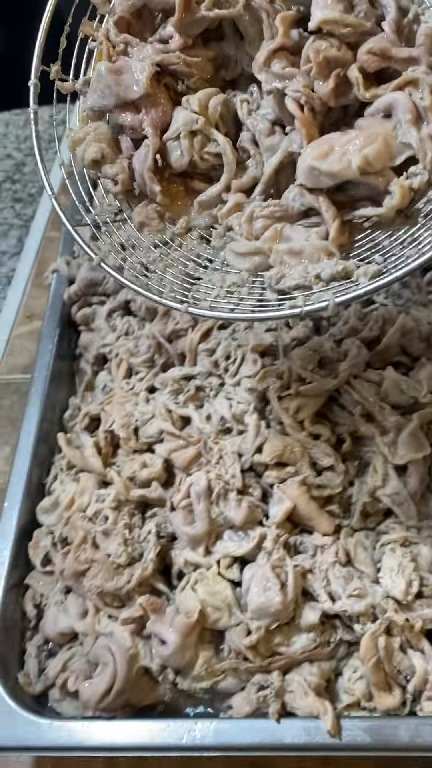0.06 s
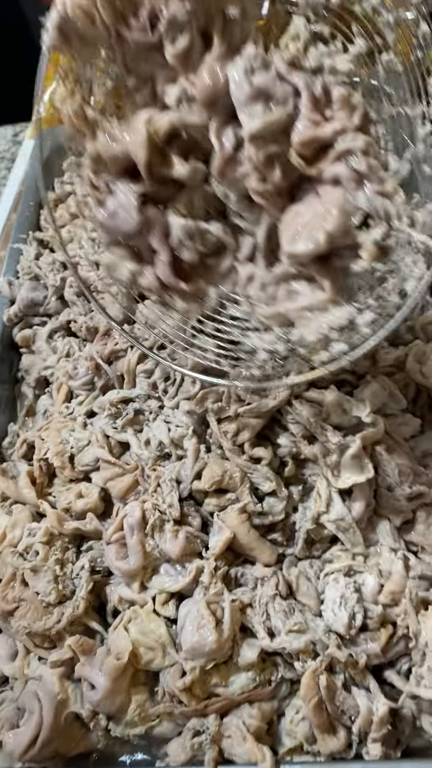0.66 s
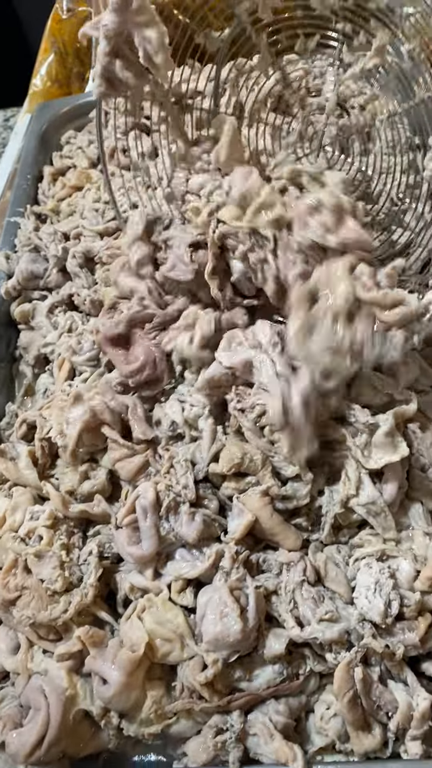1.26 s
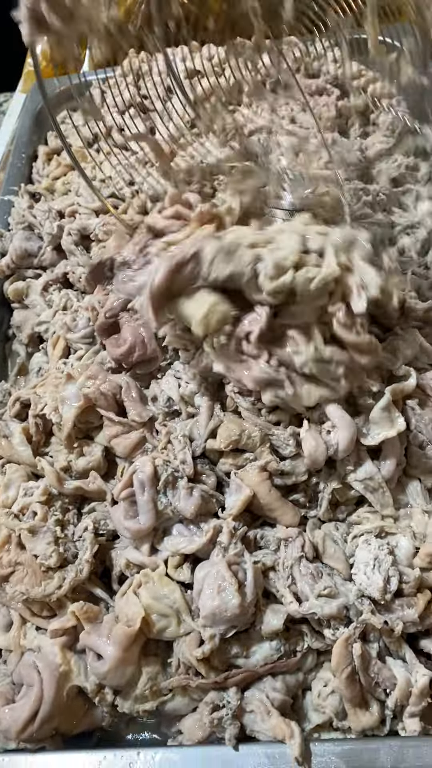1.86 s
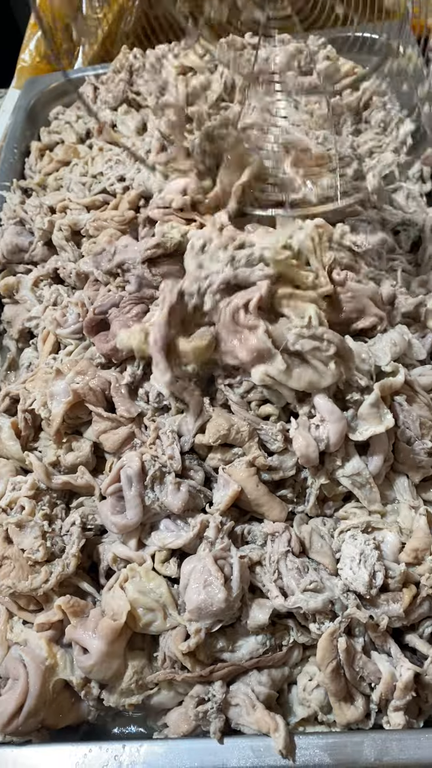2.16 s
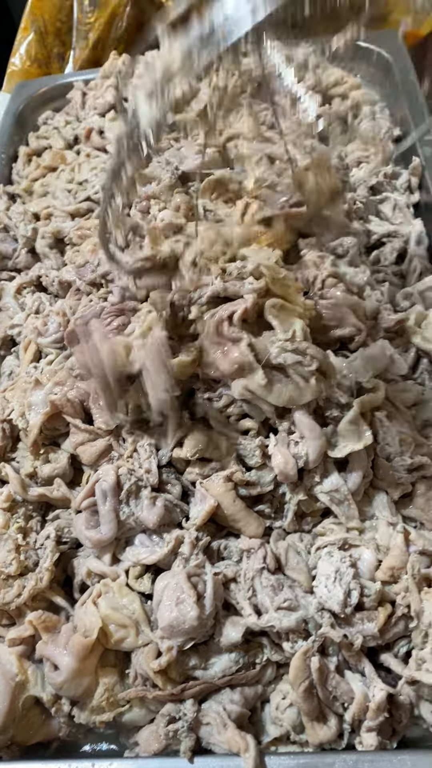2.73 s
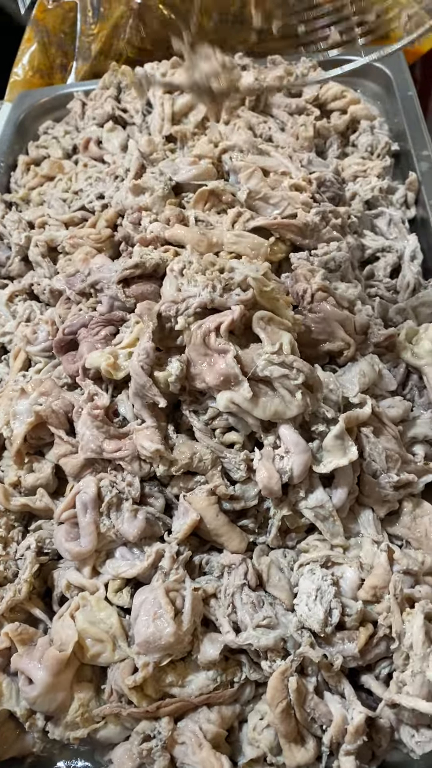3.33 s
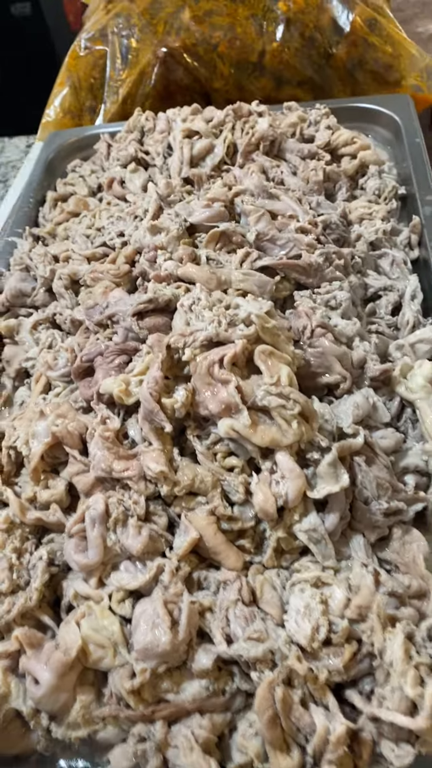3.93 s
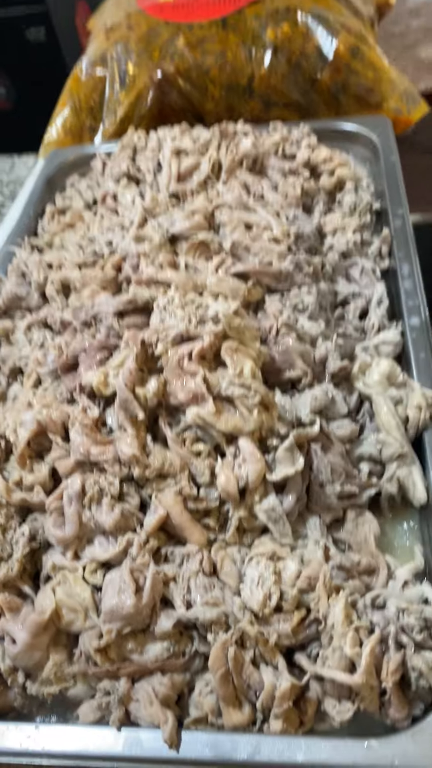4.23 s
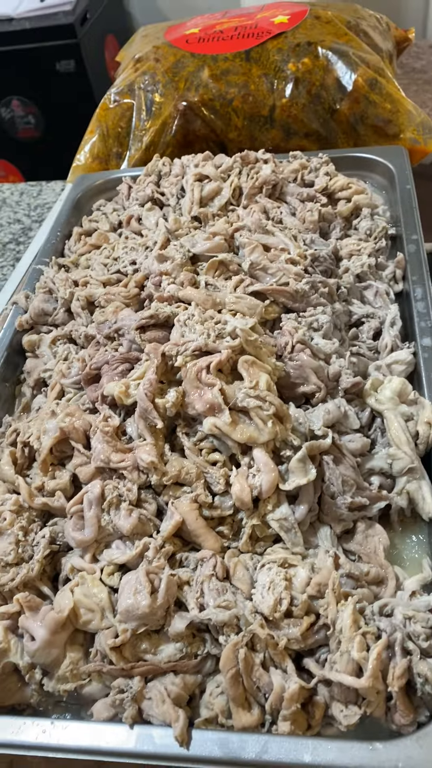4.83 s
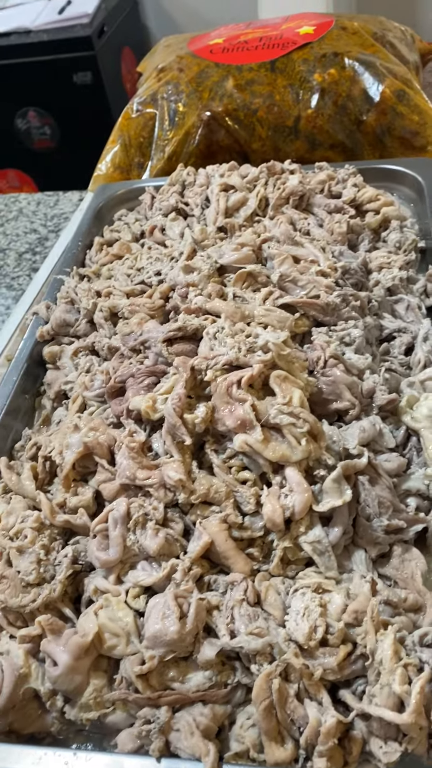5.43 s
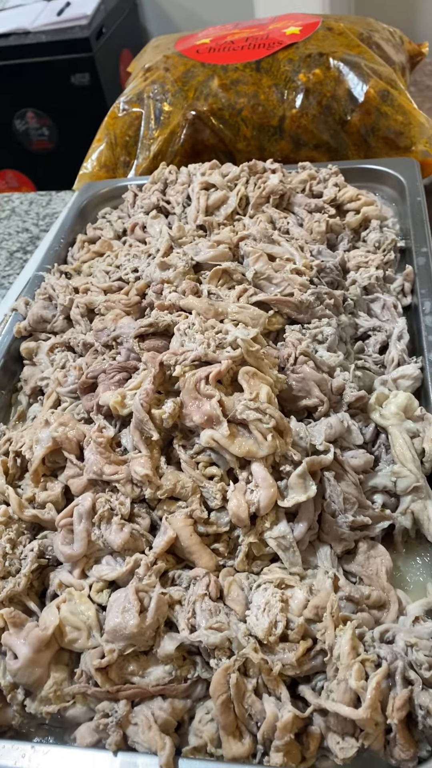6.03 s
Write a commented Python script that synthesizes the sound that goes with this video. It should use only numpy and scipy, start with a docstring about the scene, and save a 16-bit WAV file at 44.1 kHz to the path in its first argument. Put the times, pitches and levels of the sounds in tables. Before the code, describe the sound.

In a kitchen with a low, steady fridge hum, boiled meat slides off a wire skimmer into a full pan with faint, wet smacks. After a lull, the skimmer knocks loudly against a steel pot and sets it ringing. It digs through meat and broth, wires rasping on the wall, then rises with streaming water and plopping drips before knocking on the pot again. The sounds are close, with a short room reverberation.

```python
"""A kitchen, heard through two closely spaced microphone ports, with fridge motors humming behind.
Boiled meat slides off a wire skimmer into a full pan with soft, wet smacks. The skimmer then knocks
into the steel pot beside it and sets it ringing, digs through meat and broth with its wires rasping
on the wall, rises with water streaming through them, drips, and knocks on the pot again.
Close walls answer with a quick flurry of reflections, the room with a longer tail."""
import sys
import numpy as np
from scipy import signal
from scipy.fft import rfft, irfft, next_fast_len
from scipy.io import wavfile

SR = 44100
rng = np.random.default_rng(int(sys.argv[2]) if len(sys.argv) > 2 else 0)


def to_wav(sig):
    """Store sig (one row per channel, or 1-D mono) as 16-bit WAV at the path in sys.argv[1].

    Samples outside -1..1 are clipped; the rate is SR.
    """
    pcm = np.clip(np.atleast_2d(sig), -1, 1) * 32767
    pcm = np.round(pcm).astype(np.int16)
    wavfile.write(sys.argv[1], SR, pcm.T)  # frames by channels


N = 272538
TIME = np.arange(N) / SR

# The kitchen's reverberation. Each row: frequency in Hz, seconds to fall 60 dB.
ROOM_DECAY = [(200, 0.81), (1000, 0.9), (4000, 0.74), (10000, 0.38)]

MOTOR_HZ, BEAT_HZ, SWELL_S = 59, 0.508, 1.12  # the two motors are in step at SWELL_S
FAN_HZ, SING_HZ, WHINE_HZ = 205.1, 1194, 2902
# Resonances of the fridge cabinet. Each row: pitch in Hz, width in Hz, level in dB.
CABINET_MODES = [(197.2, 13, -63.5), (272, 15, -62)]
# Thin, steady tones of the compressor. Each row: pitch in Hz, level in dB.
COMPRESSOR_TONES = [(1253, -86), (2073, -78.5)]
# The fridge's singing tone grows. Each row: time in seconds, level in dB.
SING_LEVEL = [(0, -77), (3.3, -79.5), (4.2, -70.5)]
# The high whine swells twice. Each row: time in seconds, level in dB.
WHINE_LEVEL = [(0, -86), (.4, -90), (.7, -80), (1.35, -82.5), (1.55, -90.5), (2.4, -89), (2.6, -83),
               (3.9, -84), (4.2, -88)]
# A tone just below the whine comes and goes. Each row: time in seconds, level in dB.
UNDERTONE_LEVEL = [(2.5, -93), (3.1, -81), (3.6, -84), (4.1, -89)]
# Room tone of the kitchen. Each row: frequency in Hz, relative density in dB.
AIR_SPECTRUM = [(30, -20.5), (50, -1), (95, 3), (135, -3.5), (290, -4.5), (400, -11.5), (500, -15),
                (750, -15), (1150, -23), (2100, -30), (3200, -38), (4300, -42.5), (5400, -55),
                (7000, -55.5), (10000, -64.5), (13000, -77)]

# Portions of meat slide over the wires. Each row: start in seconds, end in seconds, level in dB.
MEAT_SLIDES = [(0, .3, -85), (0.558, .76, -83.5), (0.76, 0.866, -79.5), (0.906, 1.12, -80),
               (1.13, 1.33, -79), (1.55, 1.898, -86), (2.01, 2.08, -83.5), (2.67, 2.772, -76.5)]
# Moist rustle of sliding meat. Each row: frequency in Hz, relative density in dB.
SQUELCH_SPECTRUM = [(1000, -4), (2200, 12.5), (3200, 4.5), (4250, 8), (5400, -6), (7200, -12.5),
                    (10000, -23), (13000, -32.5)]
# Smacks of meat and ticks of wire. Each row: start in seconds, direct peak in dB, pitch in Hz,
# send to the room in dB, decay time in seconds.
WET_SMACKS = [(.076, -63, 6600, -14, .002), (.259, -60, 6600, -5, 0.0017), (.292, -57, 5850, -9, .002),
              (.768, -65, 2410, -1, 0.0027), (.806, -60, 2280, -1, 0.005), (.824, -64.5, 2700, -3, 0.004),
              (.865, -68, 4600, -2, 0.0043), (1.162, -64, 2600, -2, 0.0027), (1.18, -63, 4000, 0, .006),
              (1.207, -66, 4100, 2, 0.0055), (1.269, -56.5, 5360, -8, 0.0017),
              (1.363, -58, 4020, -8, 0.0021), (1.605, -58, 1970, 0, 0.0037),
              (1.626, -59.5, 4000, -7, 0.0015), (1.675, -64, 2390, -5, .01), (1.722, -63, 2480, -9, 0.0045),
              (1.883, -64.5, 3900, 1, .005), (2.233, -53, 2640, -9, 0.0037), (2.494, -70, 5900, -6, 0.0019),
              (2.725, -59, 1700, -2, 0.0028), (2.758, -60, 2300, -3, .003), (2.76, -51, 4700, -4.5, 0.0023),
              (2.761, -70, 6400, -8, 0.0027), (2.772, -54.5, 1490, -10, 0.0036),
              (4.073, -54, 3960, 7, 0.0059), (4.073, -60.5, 5650, 2.5, 0.0035),
              (4.462, -57, 3540, 10.5, .0023), (4.773, -42, 8050, -14, 0.0024),
              (4.802, -43, 9200, -14, 0.002), (5.556, -28, 3920, -18, 0.0047),
              (5.65, -48, 5150, -3, 0.0033), (5.747, -52, 5500, 2, 0.005), (5.753, -35, 3170, -4, .004),
              (5.793, -35, 2750, -5, 0.014), (5.793, -43.5, 5270, -5, 0.0042),
              (5.857, -59, 6850, -11, 0.0035), (6.063, -60, 6380, -2, .003),
              (6.091, -32.5, 3430, -3, 0.0071), (6.139, -33, 3680, -4, 0.0023)]
# Dull bumps of the heavy load. Each row: start in seconds, level in dB, pitch in Hz, width in Hz,
# length in seconds.
LOAD_BUMPS = [(4.119, -50, 255, 70.5, 0.19), (4.501, -51, 272, 39.6, 0.64), (4.6, -45, 232, 60, 0.094),
              (4.793, -37, 805, 397, 0.037), (4.8, -46.5, 229, 199, 0.12), (4.818, -42, 110, 44.7, .065),
              (4.837, -37, 845, 300, 0.027), (5.745, -44.5, 750, 160, 0.034)]

# The skimmer hits the pot. Each row: start in seconds, clatter in dB, ring of the pot in dB.
POT_KNOCKS = [(4.475, -24.5, -51), (4.609, 2, 4), (4.623, -5.5, 0.5), (4.772, -1, 2.5), (4.802, -5, -8.5),
              (4.845, -10, -8.5), (6.151, 1, -9), (6.16, -8, -7), (6.1745, 6.5, 2)]
# Modes of pot and skimmer. Each row: pitch in Hz, relative level in dB, seconds to fall 60 dB.
POT_MODES = [(543, -13.5, 0.7), (759, -7, 0.46), (1019, -3.5, 0.56), (1105, 4, 0.54), (1159, 4, 0.34),
             (1288, 5, 0.2), (1392, 1, 0.65), (1660, -8, 0.58), (1892, 0.5, .6), (1990, 3, 0.55),
             (2060, 0.5, 0.22), (2237, 2, 0.4), (2294, 5, 0.5), (2560, 3, 0.4), (2940, 4, 0.29),
             (3410, -6.5, 0.16), (3480, -9, 0.15), (3930, -11, 0.16), (4690, -3, 0.29)]
# Clatter of the wire basket. Each row: frequency in Hz, relative density in dB.
CLATTER_SPECTRUM = [(200, -24.5), (400, -16.5), (550, -16), (900, -11.5), (1150, 2.5), (1550, -4.5),
                    (2100, -3), (3000, -6.5), (4000, -1), (5000, -14), (5800, -17.5), (7500, -22),
                    (10000, -34.5), (12500, -68)]

# The skimmer enters, plunges, digs, shoves, turns, lifts, drags harder, sloshes twice, grazes the wall.
# Each row: start, attack and end in seconds, growth in dB per second, then relative levels in dB
# of churning, fizz, gurgle, drag on the pot, grinding of the rim and rasp of the wires.
SKIMMER_STROKES = [(4.66, 0.1, 4.77, 20, -42.5, -42.5, -67, -46.5, -47.5, -40),
                   (4.788, 0.015, 4.8, -5, -32, -41, -39, -46, -33, -51),
                   (4.82, 0.058, 5.07, -12.5, -34.5, -36, -43.5, -37.5, -39, -39),
                   (4.895, .025, 4.92, -13, -42, -40, -50, -44, -31, -49.5),
                   (5.091, .1, 5.2, 4, -42.5, -51.5, -54, -46, -50, -50),
                   (5.21, 0.057, 5.563, 3, -44, -45, -55, -54, -44.5, -38),
                   (5.38, 0.056, 5.563, -6.5, -42, -39, -49, -47.5, -43.5, -39.5),
                   (5.734, 0.0066, 5.76, -51, -42.5, -49.5, -51.5, -49, -57, -65),
                   (5.787, 0.0035, 5.87, -78, -43.5, -46.5, -52, -48.5, -57, -50.5),
                   (6.086, 0.0044, 6.04, -61, -50, -72, -77, -70, -47, -46.5)]
SETTLE_DB_PER_S, LIFT_OFF_DB_PER_S = 143, 421  # broth settles; scraping stops almost at once
# Churning broth. Each row: frequency in Hz, relative density in dB.
CHURN_SPECTRUM = [(330, -14.5), (450, -19), (580, 3.5), (690, -14), (820, -3), (950, -16.5), (1130, -0.5),
                  (1550, 1), (1850, 1.5), (2200, 5), (2650, -2), (3300, -1.5), (4000, -1.5), (4600, -8.5),
                  (5700, -23), (8000, -30), (10500, -36), (13000, -77)]
# Water streaming through wire. Each row: frequency in Hz, relative density in dB.
FIZZ_SPECTRUM = [(1500, -14.5), (2600, -7), (3300, 1), (3900, 1.5), (4500, -3.5), (4950, -15.5),
                 (5600, -17), (6800, -16), (8500, -25), (10200, -34), (11800, -67.5)]
# The wires' rasp moves with the point of contact. Each row: time in seconds, pitch in Hz.
WIRE_PITCH = [(4.76, 4050), (4.95, 3863), (5.28, 3834), (5.37, 4005), (5.48, 3660), (5.56, 4010),
              (5.61, 3590), (6.1, 3600)]
# The rim's lower grinding moves likewise. Each row: time in seconds, pitch in Hz.
RIM_PITCH = [(4.78, 2370), (4.86, 1920), (4.93, 2030), (5.03, 2100), (5.3, 1940), (5.5, 2200), (5.8, 2500)]
# Single large bubbles. Each row: start in seconds, level in dB, starting pitch in Hz.
LARGE_BUBBLES = [(4.846, -35, 768), (5.606, -28, 1110), (5.664, -28, 2010), (5.695, -38, 2160),
                 (5.701, -31, 1655), (5.75, -30.5, 935), (5.768, -27, 831), (5.783, -34, 1340),
                 (5.832, -36, 1255), (5.845, -33.5, 835), (5.868, -34, 1450), (5.898, -48, 1200),
                 (5.952, -41, 1150)]

# Phase between the microphone ports. Each row: frequency in Hz, lead of the left in radians.
MIC_PHASE = [(100, 0), (330, 0.55), (480, 3), (900, 4), (1300, 4), (1800, 6.2), (2600, 4), (3300, 3),
             (4000, 6), (4600, 3), (5400, 3), (5750, 0.3), (9000, 2.1)]
# How alike the two ports sound. Each row: frequency in Hz, likeness from 0 to 1.
MIC_LIKENESS = [(100, 1), (260, 0.87), (440, .65), (800, 0.94), (1100, .75), (1500, .2), (1900, .45),
                (2800, 0.85), (3500, .4), (4300, .12), (5100, .75), (5650, .3), (6200, 0.91), (9000, .75)]
# Balance of the ports. Each row: frequency in Hz, left over right in dB.
MIC_BALANCE = [(100, 0), (160, 1.8), (260, 4.5), (420, 8.5), (690, 6.5), (1130, 3.5), (1840, 1.5),
               (3000, -1), (4900, -1.5), (8000, 0)]


def amp(db):
    """Decibels to gain."""
    return 10 ** (np.asarray(db) / 20)


def unit(x):
    """Scales to rms 1."""
    return x / np.sqrt(np.mean(x ** 2) + 1e-20)


def at_hz(points, hz):
    """Reads a table on a log-frequency axis."""
    f, value = np.transpose(points)
    return np.interp(np.log(hz + 1), np.log(f + 1), value)


def over_time(points):
    """Reads a table at every moment of the scene."""
    return np.interp(TIME, *np.transpose(points))


def add(mix, s, sound):
    """Adds a sound to the mix at s seconds."""
    part = mix[..., round(s * SR):][..., :sound.shape[-1]]
    part += sound[..., :part.shape[-1]]


def convolve(x, response):
    """Convolves along time and keeps the length of the scene."""
    return signal.fftconvolve(np.atleast_2d(x), np.atleast_2d(response), axes=1)[:, :N]


def colour(x, spectrum, size=4096):
    """Causal filter of unit energy, shaped like the given spectrum."""
    log_gain = np.log(amp(at_hz(spectrum, abs(np.fft.fftfreq(size, 1 / SR)))))
    response = np.fft.ifft(np.exp(np.conj(signal.hilbert(log_gain)))).real[:size // 2]
    return convolve(x, response / np.linalg.norm(response))


def narrow_noise(hz, width, size=N):
    """Two unrelated noises in one steep resonance."""
    f = np.fft.rfftfreq(size, 1 / SR)
    white = rfft(rng.standard_normal((2, size)))
    return unit(irfft(white / (1 + ((f - hz) / width) ** 2) ** 2, size))


def tone(hz, waver):
    """A sine of rms 1 whose phase wanders by about waver radians, a few times a second."""
    knots = np.linspace(0, TIME[-1], num=40)
    wander = np.interp(TIME, knots, rng.standard_normal(len(knots)))
    return unit(np.sin(2 * np.pi * hz * TIME + waver * wander))


def patter(per_s, spread_db):
    """Two unrelated trains of random clicks; the spread makes a few of them large."""
    trains = []
    for _ in range(2):
        size = amp(spread_db * np.minimum(rng.exponential(1, N), 4)) * rng.choice([-1, 1], N)
        trains.append(unit(size * (rng.random(N) < per_s / SR)))
    return np.array(trains)


def gesture(start, attack, end, fall_db_per_s, growth_db_per_s=0):
    """Gain of one movement: attack, a hold that may grow or fade, release."""
    held, after = np.clip(TIME, start, end) - start, np.maximum(TIME - end, 0)
    return np.clip((TIME - start) / attack, 0, 1) * amp(growth_db_per_s * held - fall_db_per_s * after)


def kitchen(x, near_db, tail_db, near_t60):
    """Direct sound, a quick flurry from close walls, and the tail from farther off in the room."""
    t = np.arange(SR * 3 // 4) / SR
    near, far = rng.choice([-1., 1.], (2, 2, len(t))) * (rng.random((2, 2, len(t))) < 4000 / SR)
    near = near * amp(-60 * t / near_t60)
    hz, age, spectra = signal.stft(far * np.minimum(t / 0.01, 1), SR, nperseg=256)
    decay = amp(-60 * age / at_hz(ROOM_DECAY, hz)[:, None])
    far = signal.istft(spectra * decay, SR, nperseg=256)[1][:, :len(t)]
    flurry = amp(near_db) * near / np.linalg.norm(near[0])
    tail = amp(tail_db) * far / np.linalg.norm(far[0])
    response = (t == 0) + flurry + tail
    return convolve(x, response / np.linalg.norm(response[0]))


def fridge():
    """Two motors of almost equal speed beat slowly over a shaking cabinet, a fan and thin tones."""
    t = TIME - SWELL_S
    turn, beat = 2 * np.pi * MOTOR_HZ * t, 2 * np.pi * BEAT_HZ * t
    hum = amp(-45.5) * unit(np.sin(turn) + amp(-8) * np.sin(turn - beat))
    cabinet = sum(amp(db) * narrow_noise(hz, width) for hz, width, db in CABINET_MODES)
    fan = amp(-59) * tone(FAN_HZ, waver=0.63)
    compressor = sum(amp(db) * tone(hz, waver=0.48) for hz, db in COMPRESSOR_TONES)
    sing = tone(SING_HZ, waver=0.39) * amp(over_time(SING_LEVEL))
    return cabinet + np.array([hum + fan + compressor + sing, np.zeros(N)])


def whine(flutter_db=2):
    """The compressor's high whine flutters once a motor turn and reaches both ports alike."""
    flutter = amp(flutter_db * np.sin(2 * np.pi * MOTOR_HZ * (TIME - SWELL_S)))
    upper = unit(tone(WHINE_HZ, waver=.2) * flutter) * amp(over_time(WHINE_LEVEL))
    return upper + tone(WHINE_HZ - MOTOR_HZ, waver=.3) * amp(over_time(UNDERTONE_LEVEL))


def room_tone():
    """Steady rush of fans and air around the microphone."""
    return amp(-52.5) * colour(rng.standard_normal((2, N)), AIR_SPECTRUM)


def smacks(q=3.2):
    """Wet pieces part and land: each a tiny burst that rings about one pitch, over a moist rustle."""
    direct, to_room = np.zeros((2, 2, N))
    t = np.arange(SR // 25) / SR
    edge = 1 + .5 / q
    for s, db, hz, send_db, decay in WET_SMACKS:
        band = signal.butter(3, [hz / edge, min(hz * edge, SR / 3)], "band", fs=SR)
        snap = signal.lfilter(*band, rng.standard_normal((2, len(t))) * np.exp(-t / decay))
        snap = amp(db) * snap / abs(snap).max()
        add(direct, s, snap)
        add(to_room, s, amp(send_db) * snap)
    sliding = sum(amp(db) * gesture(start, attack=0.036, end=end, fall_db_per_s=73)
                  for start, end, db in MEAT_SLIDES)
    rustle = colour(patter(per_s=600, spread_db=6.5), SQUELCH_SPECTRUM) * sliding
    return direct + kitchen(to_room + rustle, near_db=13.5, tail_db=6.0, near_t60=0.15)


def bumps():
    """The load shifts and slaps into the broth with soft, low thuds."""
    out = np.zeros((2, N))
    for s, db, hz, width, length in LOAD_BUMPS:
        thud = unit(narrow_noise(hz, width, size=SR)[:, :round(length * SR)])
        add(out, s, amp(db) * thud * np.sin(np.linspace(0, np.pi, thud.shape[1])))
    return out


def pot_ring(bend=.008, attack_s=.0008, knots=20):
    """The pot's answer to one blow, heard from two sides; sloshing broth bends each mode's pitch."""
    t, ring = np.arange(SR * 2 // 5) / SR, 0
    for hz, db, t60 in POT_MODES:
        slosh = np.interp(t, np.linspace(0, t[-1], knots), rng.standard_normal(knots))
        turns = np.cumsum(hz * (1 + bend * slosh)) / SR
        ring = ring + amp(db - 60 * t / t60) * np.sin(2 * np.pi * (turns + rng.random((2, 1))))
    ring = ring * np.sin(np.pi / 2 * np.minimum(t / attack_s, 1)) ** 2
    return ring / np.linalg.norm(ring[0])


def knocks(contacts=3, rebound_s=0.0033, rebound_db=-3):
    """The springy wire basket clatters on the pot, rebounds, and sets the wall ringing."""
    crack, ring = np.zeros((2, 2, N))
    t = np.arange(SR // 50) / SR
    for s, db, ring_db in POT_KNOCKS:
        for k in range(contacts):
            rattle = rng.standard_normal((2, len(t))) * np.exp(-t / 0.002)
            add(crack, s + k * rebound_s, amp(db + k * rebound_db) * rattle / np.linalg.norm(rattle[0]))
        add(ring, s, amp(ring_db) * pot_ring())
    return ring + kitchen(colour(crack, CLATTER_SPECTRUM), near_db=4.5, tail_db=2.0, near_t60=0.06)


def stroke_gains():
    """Each stroke drives churn, fizz, gurgle and drag, which settle, and rim and wires, which cut off."""
    power = np.zeros((6, N))
    for start, attack, end, growth, *levels_db in SKIMMER_STROKES:
        effort = gesture(start, attack, end, SETTLE_DB_PER_S, growth)
        contact = gesture(start, attack, end, LIFT_OFF_DB_PER_S, growth)
        fizz = effort ** 1.63  # follows the effort more steeply than churning does
        shapes = np.array([effort, fizz, effort, effort, contact, contact])
        power += (amp(levels_db)[:, None] * shapes) ** 2
    return np.sqrt(power)


def bubble(hz, t60, glide=0.017):
    """A dying sine whose pitch drifts as the bubble nears the surface."""
    t = np.arange(0, t60, 1 / SR)
    envelope = amp(-60 * t / t60) * (1 - np.exp(-t * hz / 2))
    return envelope * np.sin(2 * np.pi * hz * t * (1 + glide * t / t60))


def bubbling(low_hz, high_hz, per_s, cycles):
    """A stream of bubbles: the larger, the lower, each dying within so many cycles."""
    out = np.zeros(N)
    for when, strength, size in rng.random((round(per_s * TIME[-1]), 3)):
        hz = high_hz * (low_hz / high_hz) ** size
        add(out, when * TIME[-1], amp(12.0 * strength) * bubble(hz, cycles / hz))
    return unit(out)


def scoop(churn, fizz, gurgle, drag, splashes_per_s=4000, cushion_hz=1510):
    """Countless small splashes churn and fizz through the wires, while the rim drags on the pot."""
    lumps = amp(narrow_noise(0, width=70)[0])  # the meat gives way unevenly, by about 1 dB
    churning = colour(patter(splashes_per_s, spread_db=2.5) * lumps * churn, CHURN_SPECTRUM)
    fizzing = colour(patter(splashes_per_s, spread_db=3.5) * fizz, FIZZ_SPECTRUM)
    splash = amp(-2.5) * churning + amp(-2.0) * fizzing
    # small bubbles ring high; pockets of air ring low as the meat rolls over
    froth = amp(-6.0) * churn * bubbling(1299, 2870, per_s=220, cycles=74)
    pockets = amp(-3.0) * gurgle * bubbling(492, 1024, per_s=200, cycles=12)
    bubbles = kitchen(froth + pockets, near_db=8.0, tail_db=0.5, near_t60=0.064)
    # wet meat cushions the rim, so mainly the pot's lower modes ring
    cushion = signal.butter(2, cushion_hz, fs=SR)
    rubbing = unit(signal.lfilter(*cushion, patter(per_s=2500, spread_db=2.5)))
    scrape = amp(-9.5) * convolve(rubbing * drag, pot_ring())
    return kitchen(splash, near_db=-9.5, tail_db=-9.5, near_t60=0.11) + bubbles + scrape


def resonate(x, hz, width):
    """A resonance that follows the curve hz."""
    turn = np.exp(2j * np.pi * np.cumsum(hz) / SR)
    r = np.exp(-np.pi * width / SR)
    return 2 * (turn * signal.lfilter([(1 - r) ** 2], [1, -2 * r, r * r], x / turn)).real


def rasp(rim_gain, wire_gain, top_hz=8500):
    """Rim and wires stick and slip on the steel, in two broad, wandering resonances with squeaks."""
    wire_hz, rim_hz = over_time(WIRE_PITCH), over_time(RIM_PITCH)
    sway = 1 + .045 * narrow_noise(0, width=19)
    wires = unit(resonate(patter(per_s=2500, spread_db=0), wire_hz * sway[0], width=720))
    rim = unit(resonate(patter(per_s=2500, spread_db=3), rim_hz * sway[1], width=490))
    wires = unit(wires + amp(-3) * np.array([squeaks(wire_hz), squeaks(wire_hz)]))
    wet_rolloff = signal.butter(4, top_hz, fs=SR)  # wet wires carry little above this
    scraping = signal.lfilter(*wet_rolloff, wires * wire_gain + rim * rim_gain)
    return kitchen(scraping, near_db=-9, tail_db=-9.5, near_t60=0.1)


def squeaks(centre_hz, per_s=140, length_s=.045, spread=.17, glide=.025):
    """Single wires catch and sing briefly, each gliding near the pitch of the rasp."""
    out, progress = np.zeros(N), np.linspace(0, 1, round(length_s * SR))
    for when, offset, slope in rng.random((round(per_s * TIME[-1]), 3)):
        start_hz = centre_hz[int(when * N)] * (1 + spread * (2 * offset - 1))
        hz = start_hz * (1 + glide * (2 * slope - 1) * progress)
        add(out, when * TIME[-1], np.sin(np.pi * progress) * np.sin(2 * np.pi * np.cumsum(hz) / SR))
    return unit(out)


def plops(cycles=42):
    """Large bubbles and small drips from the raised skimmer ring inside the pot."""
    dripping = amp(-48.5) * gesture(start=5.57, attack=0.2, end=5.86, fall_db_per_s=SETTLE_DB_PER_S)
    out = dripping * bubbling(897, 3160, per_s=35, cycles=cycles)
    for s, db, hz in LARGE_BUBBLES:
        add(out, s, amp(db) * bubble(hz, cycles / hz, glide=-0.019))
    return kitchen(out, near_db=5.5, tail_db=-6.5, near_t60=0.11)


def microphone(views):
    """Two views of the sound field reach two close ports, whose phase and level vary with frequency."""
    size = next_fast_len(N + SR // 4)
    hz = np.fft.rfftfreq(size, 1 / SR)
    first, second = rfft(views, size)
    likeness = np.clip(at_hz(MIC_LIKENESS, hz), 0, 1)
    lead, side = at_hz(MIC_PHASE, hz), amp(at_hz(MIC_BALANCE, hz) / 2)
    left = first * side
    right = (likeness * first + np.sqrt(1 - likeness ** 2) * second) * np.exp(-1j * lead) / side
    centre = np.sqrt(side ** 2 + side ** -2 + 2 * likeness * np.cos(lead)) / 2  # keeps the sum flat
    return irfft(np.array([left, right]) / centre, size)[:, :N]


def scene():
    """The kitchen as it arrives at the left and right ports."""
    churn, fizz, gurgle, drag, rim, wires = stroke_gains()
    skimmer = knocks() + scoop(churn, fizz, gurgle, drag) + rasp(rim, wires)
    return microphone(fridge() + room_tone() + smacks() + skimmer + plops() + bumps()) + whine()


def record(dry):
    """The recorder passes nothing much above 15.5 kHz."""
    band_limit = signal.firwin(255, 15500, window=("kaiser", 8), fs=SR)
    return signal.oaconvolve(dry, band_limit[None], "same")


dry = scene()
out = record(dry)
to_wav(out)
```